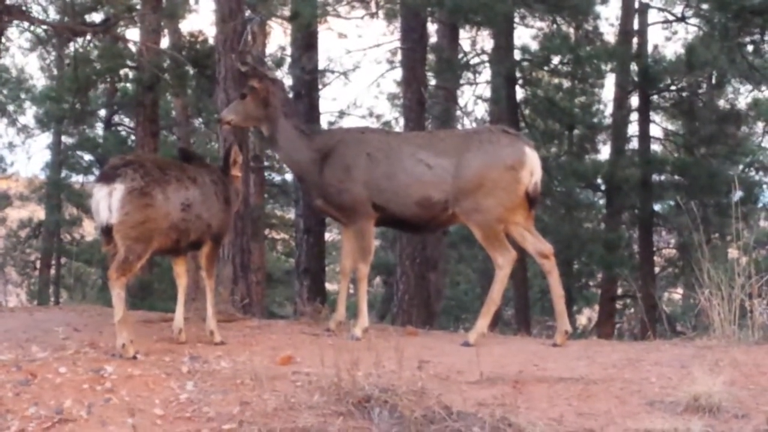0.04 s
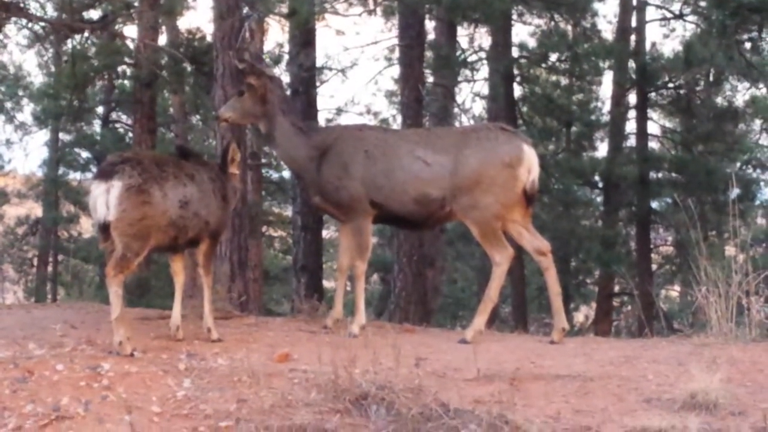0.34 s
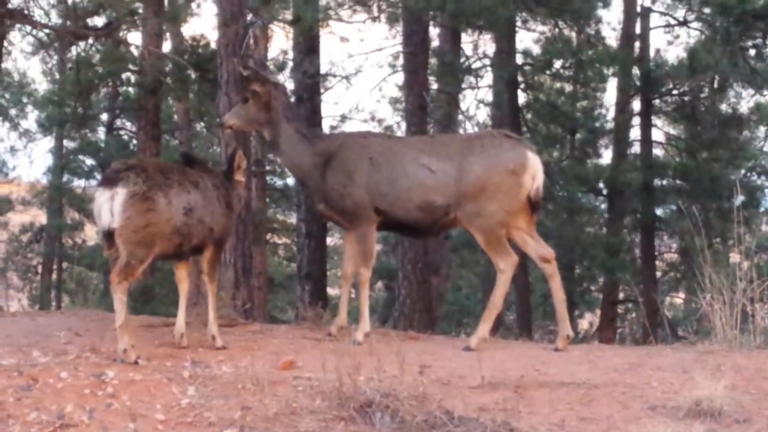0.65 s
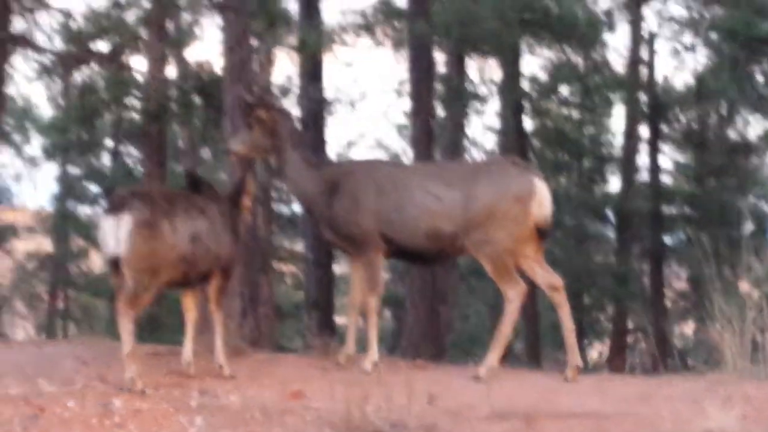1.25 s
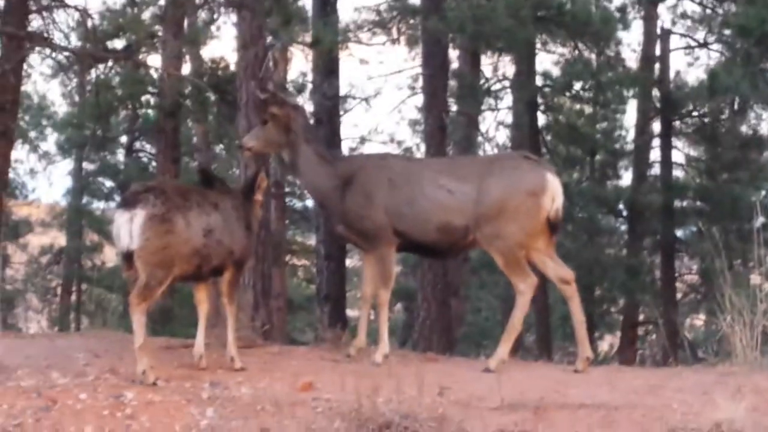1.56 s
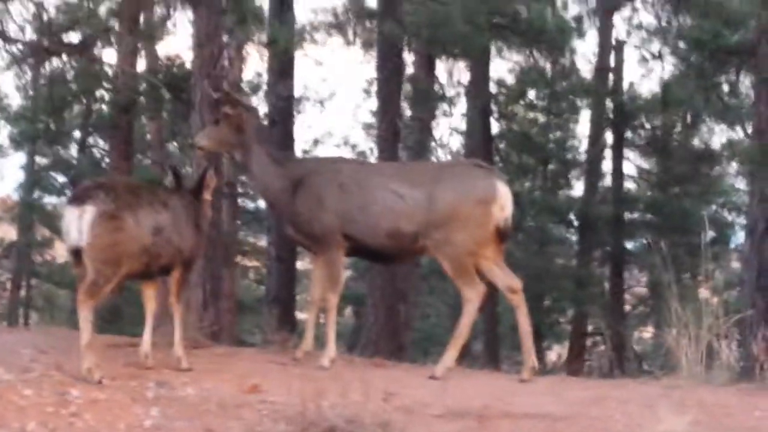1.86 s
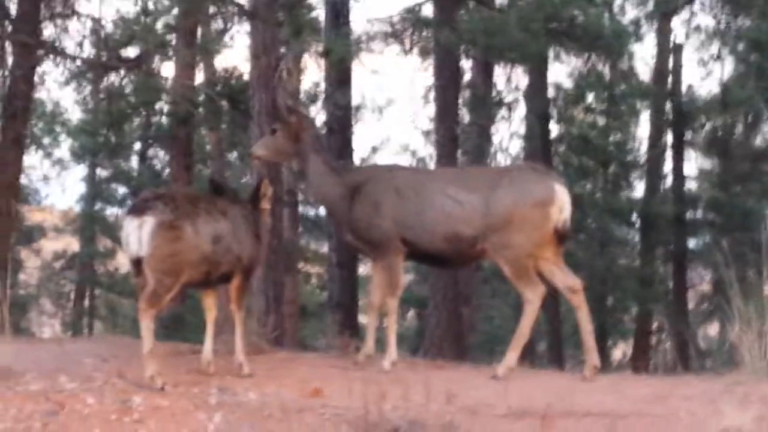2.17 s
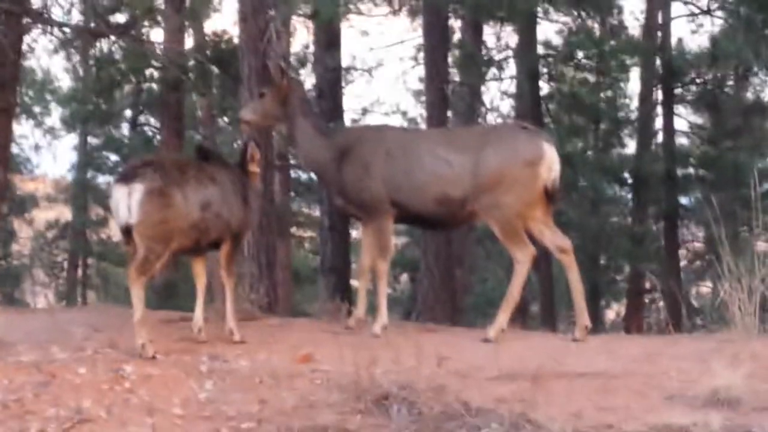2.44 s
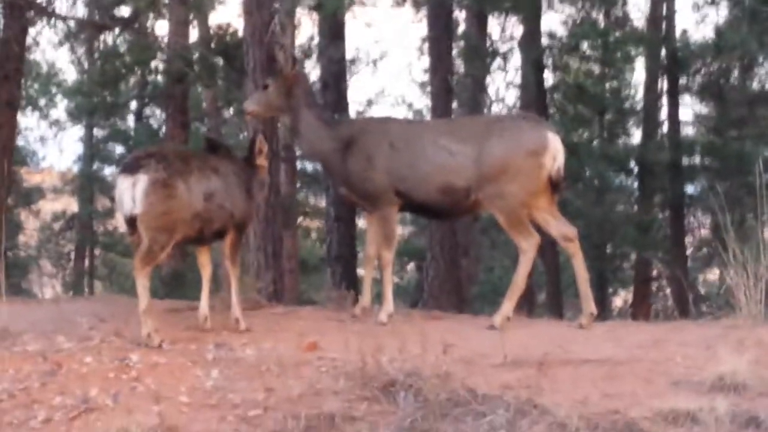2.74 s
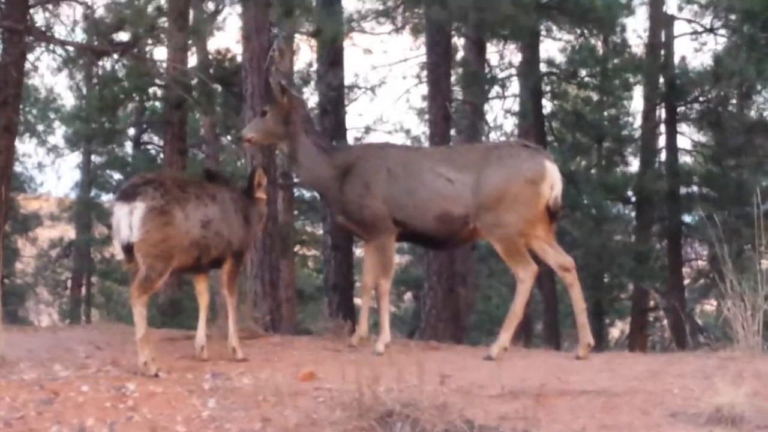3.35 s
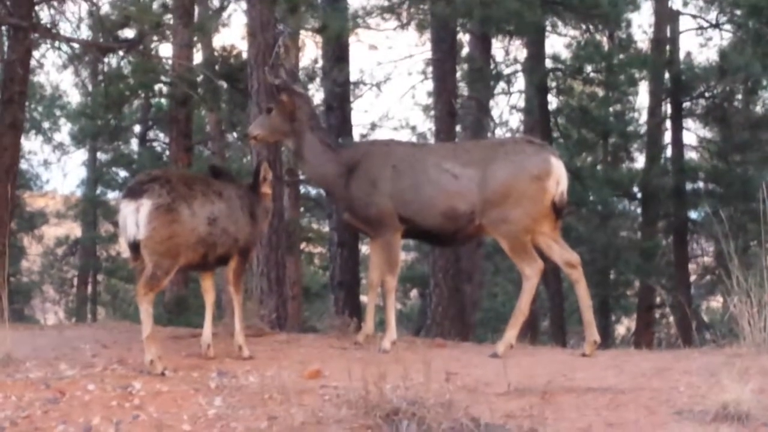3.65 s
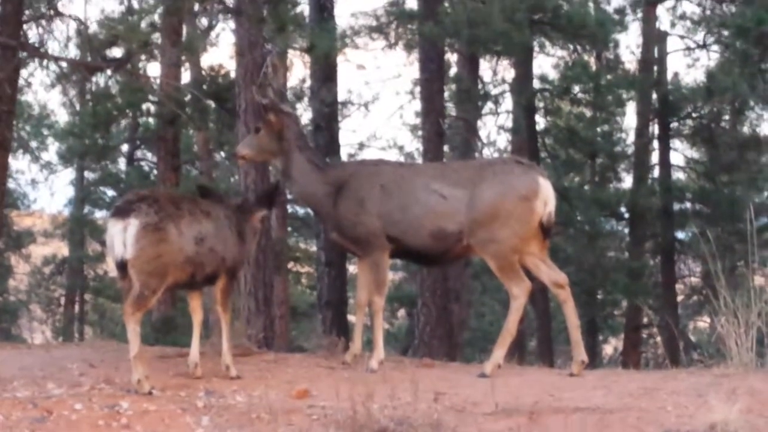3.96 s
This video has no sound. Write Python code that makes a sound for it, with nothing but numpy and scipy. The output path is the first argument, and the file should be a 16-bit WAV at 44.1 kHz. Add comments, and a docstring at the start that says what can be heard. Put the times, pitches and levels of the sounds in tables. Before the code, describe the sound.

An idling car rumbles evenly outdoors by the trees, heard from nearby, its fan rushing and its valves ticking faintly over a light hiss. Around the middle, cloth swishes in a few soft strokes to the left while the engine carries on.

```python
"""A car engine idling at the edge of a wood, heard from close by on a small stereo microphone.
Its firings make a low drone and a pulsing rumble, its belt-driven fan rushes and hums,
and the valve gear ticks faintly on every second firing, all over a steady hiss.
Halfway through, a sleeve brushes softly on the left: cloth friction in a few strokes."""
import sys
import numpy as np
from scipy import signal
from scipy.fft import rfft, irfft
from scipy.io import wavfile

SR = 44100
rng = np.random.default_rng(int(sys.argv[2]) if len(sys.argv) > 2 else 0)


def transcribe(u):
    """Save the signal u as a 16-bit wav file named by the first command-line argument.

    u: samples, shape (n,) or (channels, n), limited to [-1, 1]; the rate is SR.
    q: integer samples, one column per channel.
    """
    v = np.clip(np.atleast_2d(u).T, -1, 1)
    q = np.round(v * 32767).astype(np.int16)
    wavfile.write(sys.argv[1], SR, q)


N = 176400
TIME = np.arange(N) / SR
FREQS = np.maximum(np.arange(N // 2 + 1) * SR / N, 1)


def from_db(db):
    """Decibels to gain."""
    return 10 ** (np.asarray(db) / 20)


def unit_rms(x):
    """Scale to unit power."""
    return x / np.sqrt(np.mean(x ** 2) + 1e-20)


def pan(left_minus_right_db):
    """Left and right gains for a level difference."""
    return from_db(np.array([[.5], [-.5]]) * left_minus_right_db)


def over_frequency(rows):
    """Each column after the first, joined up on a log-frequency axis."""
    hz, *columns = np.transpose(rows)
    return [np.interp(np.log(FREQS), np.log(hz), column) for column in columns]


def white_spectra():
    """Spectra of two unrelated noises at 0 dB per Hz."""
    return rfft(rng.standard_normal((2, N))) * np.sqrt(SR / 2)


def drift(rate_hz):
    """Smooth random wander of unit rms, mostly slower than rate_hz."""
    return unit_rms(irfft(rfft(rng.standard_normal(N)) / (1 + (FREQS / rate_hz) ** 2) ** 2, N))


# The engine's idle: time_s, firing_rate_hz
IDLE_RATE = [(0, 35.46), (1.1, 35.28), (4, 35.21)]

def engine_firings(wander_hz=0.046):
    """Running count of firings at a slightly unsteady idle."""
    rate_hz = np.interp(TIME, *np.transpose(IDLE_RATE)) + wander_hz * drift(5.5)
    return np.cumsum(rate_hz) / SR


# The exhaust from close by: firing_rate_multiple, level_db
EXHAUST_ORDERS = [(.5, -78), (1, -39), (1.5, -66), (2, -49), (3, -56.5), (5, -60)]

def exhaust_drone(firings, throb_db=0.3):
    """Low tones locked to the firing rate, each throbbing a little, just left of centre."""
    tones = 0
    for multiple, level_db in EXHAUST_ORDERS:
        amplitude = np.sqrt(2) * from_db(level_db + throb_db * drift(4.9))
        tones = tones + amplitude * np.sin(2 * np.pi * (multiple * firings + rng.random()))
    return tones * pan(1)


def fan_hum(firings, pitch_hz=292.8, level_db=-55.5, waver_db=0.5):
    """The belt-driven fan's tone: its pitch follows engine speed and its level wavers."""
    cycles = pitch_hz * firings / firings[-1] * TIME[-1]
    amplitude = np.sqrt(2) * from_db(level_db - waver_db * drift(6.3))
    return amplitude * np.sin(2 * np.pi * cycles)


# Engine rumble and fan rush: frequency_hz, level_db_per_hz
RUMBLE_SPECTRUM = [(12, -90), (28, -75), (42, -65), (51, -64), (61, -71), (80, -65.5), (97, -72),
                   (120, -67), (152, -68.5), (182, -63.5), (205, -66.5), (240, -66.5), (290, -69.5),
                   (325, -73), (450, -77), (600, -80.5), (690, -79.5), (800, -83), (930, -83), (995, -83.5),
                   (1060, -86.5), (1250, -87), (1600, -90.5), (2050, -92.5), (2480, -93.5), (2800, -102),
                   (5000, -116)]
# The rumble at the microphone's two ports: frequency_hz, left_minus_right_db, coherence, left_lead_rad
MIC_PORTS = [(50, 5, 0.98, 0.5), (146, 3, .97, 0.12), (306, .8, 0.94, 0.45), (463, 2, 0.75, 1.0),
             (730, 4.5, 0.95, 1.6), (1000, 7, 0.44, 1), (1504, 1, 0.64, 4), (2000, 1, 0.38, 3.5),
             (2550, 1.5, 0.2, 6.5)]
# Slow swell of the rush: time_s, gain_db
RUSH_SWELL = [(0, -0.5), (.7, 0.2), (1.2, -0.8), (1.85, 0.1), (2.2, -1), (2.6, -.2), (3.05, 0.5),
              (3.4, 0.1), (3.8, 0.5), (4, -0.5)]

def rumble_and_rush(firings, swell_above_hz=340, pulse_db=0.04, flutter_db=0.63):
    """Dull engine and fan noise, pulsing faintly with each firing and reaching the left port first."""
    level_db, = over_frequency(RUMBLE_SPECTRUM)
    balance_db, coherence, lead_rad = over_frequency(MIC_PORTS)
    left, unrelated = white_spectra()
    right = (coherence * left + np.sqrt(1 - coherence ** 2) * unrelated) * np.exp(-1j * lead_rad)
    spectrum = np.array([left, right]) * from_db(level_db) * pan(balance_db)
    low_share = 1 / (1 + (FREQS / swell_above_hz) ** 10)
    rumble = irfft(spectrum * low_share, N)
    rush = irfft(spectrum * (1 - low_share), N)
    swell = from_db(np.interp(TIME, *np.transpose(RUSH_SWELL)))
    flutter = from_db(flutter_db * drift(11) - pulse_db * np.sin(2 * np.pi * firings))
    return (rumble + swell * rush) * flutter


# Valve gear, right of centre; one cycle is two firings:
# delay_cycles, half_length_s, pitch_hz, half_width_hz, level_db, left_minus_right_db
VALVE_TICKS = [(0.206, 0.006, 7210, 171, -65, -3), (.23, 0.0057, 8450, 800, -69, -6),
               (0.364, 0.0017, 2100, 1000, -65, -3)]

def valve_ticks(firings, spread_db=1.8):
    """The valve gear rings in short bursts that recur every second firing, varying in strength."""
    ticks, cycles = 0, firings / 2
    cycle_s = TIME[-1] / cycles[-1]
    for delay_cycles, half_length_s, pitch_hz, half_width_hz, level_db, pan_db in VALVE_TICKS:
        from_tick_s = ((cycles - delay_cycles + .5) % 1 - .5) * cycle_s
        bursts = np.exp(-.5 * (from_tick_s / half_length_s) ** 2)
        strength = from_db(level_db + spread_db * drift(13))
        resonance = 1 / (1 + ((FREQS - pitch_hz) / half_width_hz) ** 2)
        ringing = unit_rms(irfft(white_spectra() * resonance, N))
        ticks = ticks + bursts * strength * ringing * pan(pan_db)
    return ticks


# Hiss at the microphone: frequency_hz, left_db_per_hz, right_db_per_hz
HISS_SPECTRUM = [(1000, -103, -103), (3000, -99.5, -100), (3930, -99, -99.8), (4270, -97, -99.2),
                 (4650, -97.5, -100.3), (5500, -95.5, -100.2), (5930, -95, -100.2), (6360, -98, -99.3),
                 (7360, -96.5, -95), (7700, -100.8, -95), (9250, -101.4, -98), (10100, -102.7, -101.4),
                 (12200, -103, -103.4), (14500, -103, -104.5)]

def hiss():
    """Smooth, steady hiss, coloured differently by each port."""
    return irfft(white_spectra() * from_db(over_frequency(HISS_SPECTRUM)), N)


# A sleeve to the left of the microphone: peak_s, rise_s, fall_s, level_db, treble_edge_hz
SLEEVE_STROKES = [(1.796, .002, 0.0026, -53.5, 6050), (2.04, 0.035, .04, -59, 6540),
                  (2.12, 0.029, 0.048, -55, 9000), (2.26, 0.11, 0.16, -63, 4660)]
# Colour of the sleeve's swish as heard through the microphone's left port: frequency_hz, relative_db
SWISH_AT_LEFT_PORT = [(600, -10), (1500, -3), (2300, -8), (2750, -3), (3500, -10.5), (3950, -7.5),
                      (4250, -3), (4600, -7), (5400, -6), (5950, 4.5), (6300, -1.5), (6650, 0), (7400, -10),
                      (9000, -14), (12000, -32)]

def sleeve_brushes(grain_db=1.1, pan_db=7.5):
    """Cloth rubs in a few soft strokes of grainy friction noise, each with its own brightness."""
    port_colour = from_db(over_frequency(SWISH_AT_LEFT_PORT))
    brushes = 0
    for peak_s, rise_s, fall_s, level_db, treble_edge_hz in SLEEVE_STROKES:
        slope_s = np.where(TIME < peak_s, rise_s, fall_s)
        stroke = np.exp(-.5 * ((TIME - peak_s) / slope_s) ** 2)
        friction = irfft(white_spectra() * port_colour / (1 + (FREQS / treble_edge_hz) ** 6), N)
        brushes = brushes + from_db(level_db) * stroke * unit_rms(friction)
    return brushes * from_db(grain_db * drift(120)) * pan(pan_db)


def scene():
    """The close car, its parts timed by one count of firings, with the hiss and the sleeve."""
    firings = engine_firings()
    car = exhaust_drone(firings) + fan_hum(firings) + rumble_and_rush(firings) + valve_ticks(firings)
    return car + hiss() + sleeve_brushes()


def record(dry, cutoff_hz=14560):
    """The highest treble is cut steeply."""
    return signal.sosfiltfilt(signal.ellip(12, .02, 70, cutoff_hz, fs=SR, output="sos"), dry)


dry = scene()
out = record(dry)
transcribe(out)
```